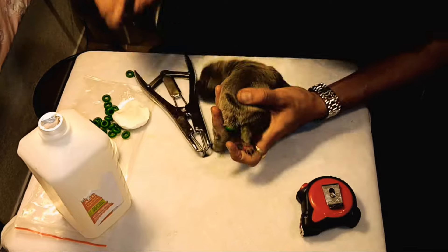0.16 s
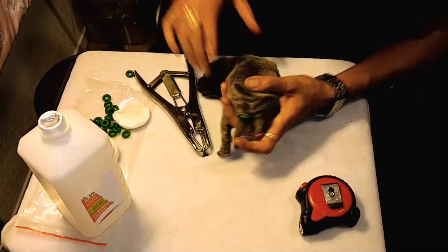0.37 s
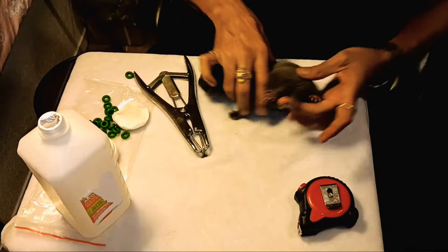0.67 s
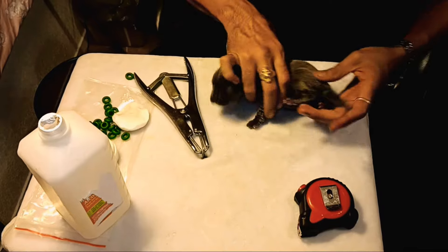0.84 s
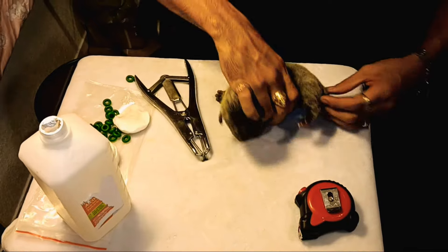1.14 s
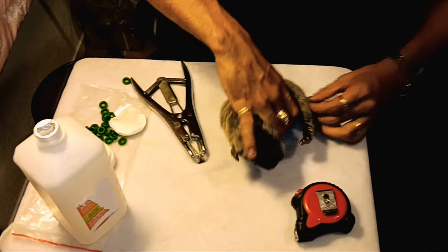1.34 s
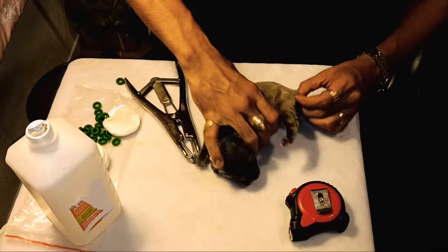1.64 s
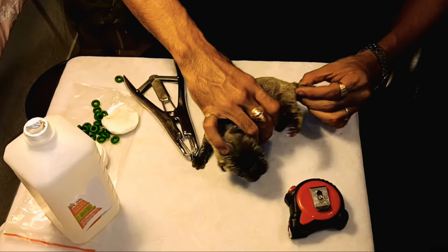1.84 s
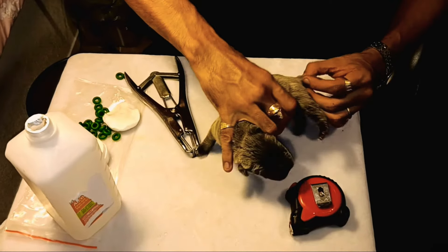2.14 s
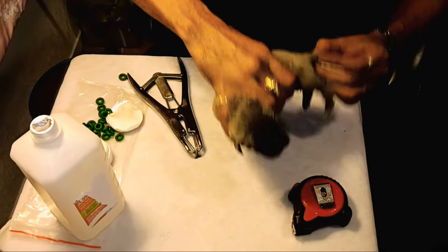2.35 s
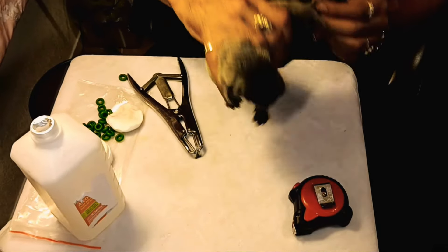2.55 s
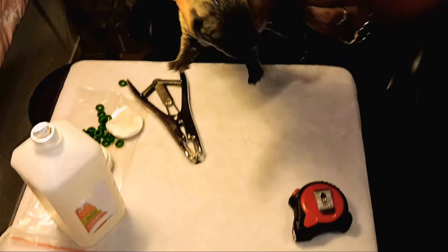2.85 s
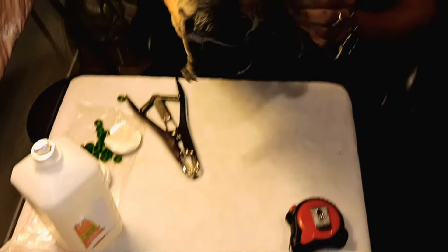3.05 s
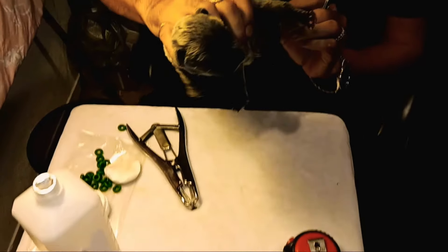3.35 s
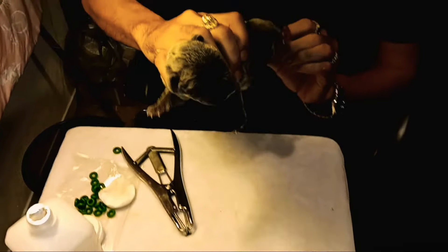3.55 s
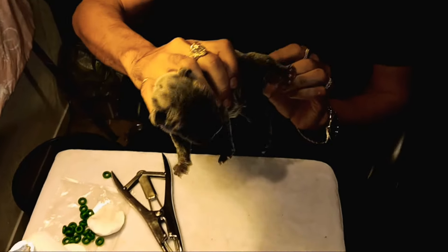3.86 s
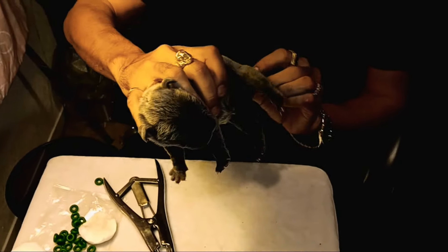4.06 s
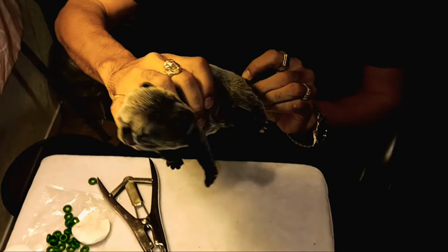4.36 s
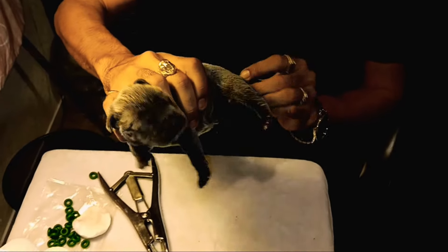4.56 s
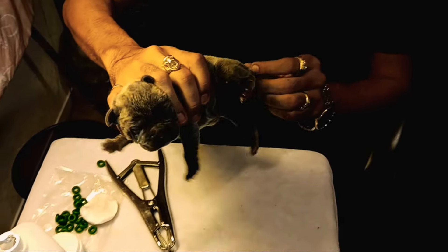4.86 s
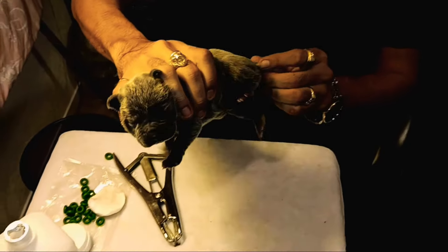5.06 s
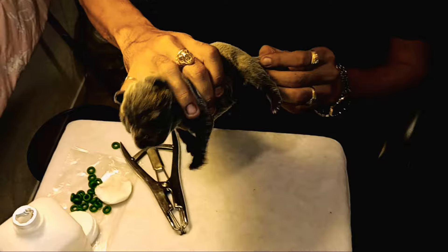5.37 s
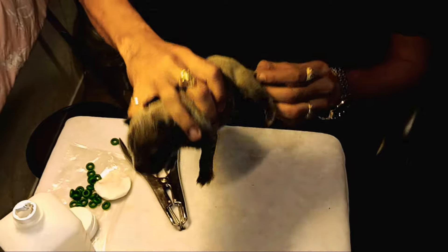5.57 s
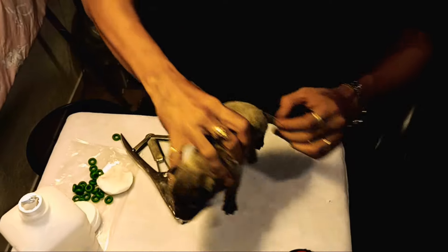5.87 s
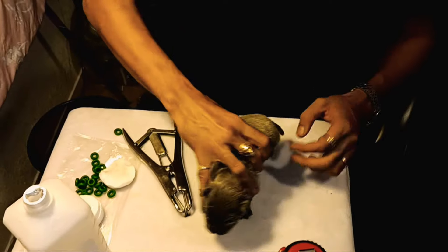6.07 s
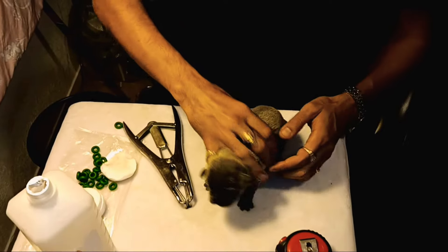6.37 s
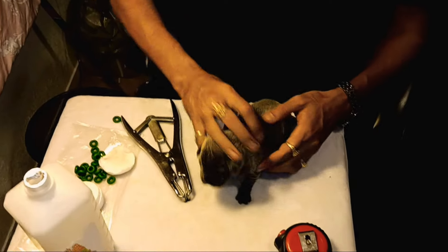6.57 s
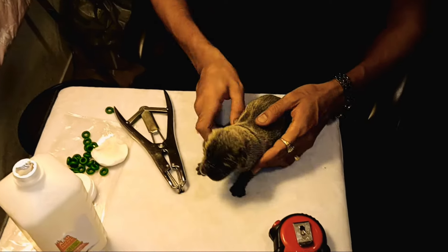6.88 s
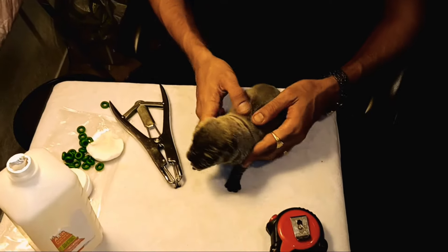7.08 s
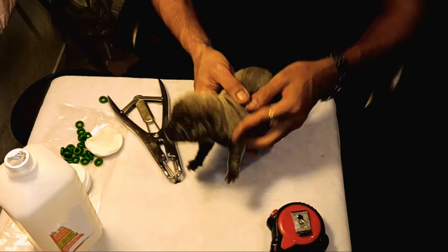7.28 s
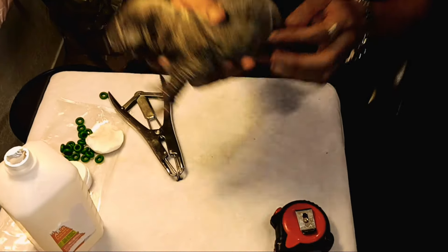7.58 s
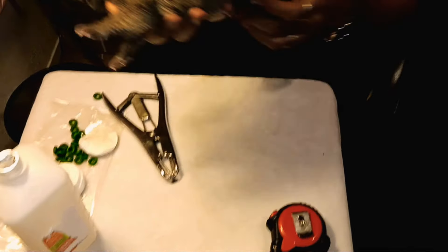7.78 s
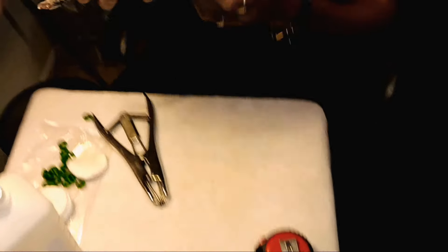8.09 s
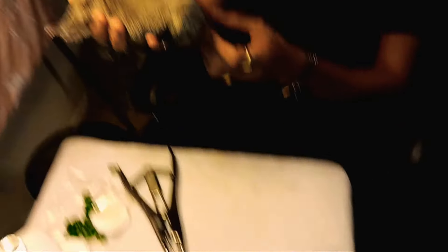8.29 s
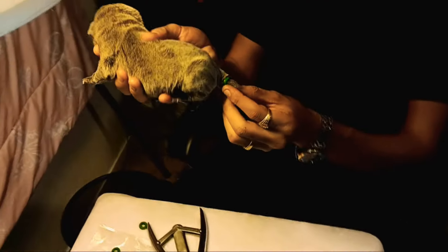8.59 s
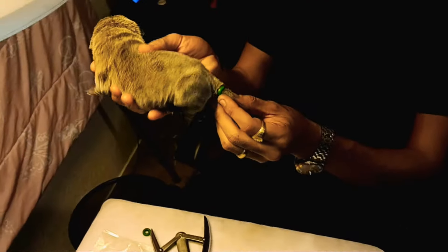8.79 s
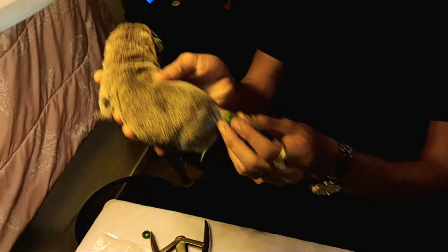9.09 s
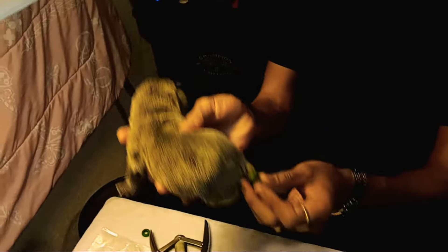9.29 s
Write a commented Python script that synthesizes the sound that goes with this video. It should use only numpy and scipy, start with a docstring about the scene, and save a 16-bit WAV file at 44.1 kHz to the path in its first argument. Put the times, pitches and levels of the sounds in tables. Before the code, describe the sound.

A newborn puppy squeals close by in short, high, wavering cries while litter mates answer in softer, lower yelps inside a hard-walled room.

```python
"""A hard-walled room: a newborn puppy held over a table squeals close to a phone, and litter mates answer.
Each cry is a clean harmonic stack that glides, wavers and breaks off on a lower note, with air in it.
Puffs of shaped noise are the panting in and around the cries; low hums are closed-mouth whimpers.
All of these are stronger at the left microphone but reach it about a millisecond after the right.
The phone turns down faint sound, and a steady hiss lies underneath."""
import sys
import numpy as np
from scipy import signal
from scipy.fft import rfft, irfft, next_fast_len
from scipy.io import wavfile
from scipy.ndimage import uniform_filter1d

SR = 44100
rng = np.random.default_rng(int(sys.argv[2]) if len(sys.argv) > 2 else 0)


def voltage_ratio(decibels):
    """Convert decibels (scalar or array-like) to amplitude ratios, 20 dB per decade."""
    exponent = np.asarray(decibels, float) / 20
    return 10 ** exponent


def master(y):
    """Save y as 16-bit WAV."""
    cut = np.clip(np.atleast_2d(y).T, -1, 1)
    pcm = np.round(cut * 32767)  # scale
    wavfile.write(sys.argv[1], SR, pcm.astype(np.int16))


N = 415863


def along(points, hz):
    """Reads a curve of (Hz, value) points on a log frequency axis, flat beyond its ends."""
    f, v = np.transpose(points)
    return np.interp(np.log(hz + 1), np.log(f + 1), v)


def unit(x):
    """Scales x to an rms of 1."""
    return x / np.sqrt(np.mean(x ** 2) + 1e-20)


def wobble(n, rate):
    """Draws a random curve of straight lines between normal knots, rate knots a second."""
    knots = rng.standard_normal(int(n * rate / SR) + 2)
    return np.interp(np.arange(n) * rate / SR, np.arange(len(knots)), knots)


def coloured(x, points):
    """Filters x by the gain of (Hz, dB) points."""
    m = next_fast_len(x.shape[-1] + 2048)
    gain = voltage_ratio(along(points, np.fft.rfftfreq(m, 1 / SR)))
    return irfft(rfft(x, m) * gain, m)[..., :x.shape[-1]]


# The steady hiss of the microphones. Each row: frequency in Hz, relative density in dB per Hz.
HISS_COLOUR = [(25, -16), (69, -13), (300, -20.5), (2200, -21), (3600, -27), (11500, -43.5), (15500, -63.5)]


def hiss():
    """Shaped noise, faint and steady, partly shared by the two microphones."""
    own = rng.standard_normal((2, N))
    shared = rng.standard_normal(N)
    return np.sqrt(2) * voltage_ratio(-76) * unit(coloured(own + 0.79 * shared, HISS_COLOUR))


# The throat's lift of the lower strong harmonic. Each row: frequency in Hz, gain in dB.
LOW_THROAT_LIFT = [(600, -0.5), (800, -1.2), (930, 3), (1060, 0.3), (1300, 0.5)]


def voice(cries, manners, throat, breath_db, break_share, fall_s, fade_s, jitter, order, rise_s=0.025):
    """Harmonics on a gliding pitch plus air rushing once a cycle; the end breaks to a lower, duller note.

    The two strongest harmonics are numbers order and order + 1.
    """
    out = np.zeros(N + SR)
    k = np.arange(1, 25)[:, None]  # harmonic numbers
    strong = slice(order - 1, order + 1)
    for rows, manner in zip(cries, manners):
        opening_db, closing_db, middle_db, gap_db, treble_db, break_db = manner
        s, hz, level = np.transpose(rows)
        start = max(s[0] - rise_s, 0)
        t = start + np.arange(round((s[-1] + fall_s + fade_s - start) * SR)) / SR
        broken = np.clip((t - s[-1]) / fall_s, 0, 1)

        # pitch: rounded corners, a fall at the end, and a jitter that grows with the break
        glide = uniform_filter1d(uniform_filter1d(np.interp(t, s, hz), size=800), size=800)
        pitch = glide * (1 - (1 - break_share) * broken)
        unsteady = 1 + jitter * (1 + 3 * broken) * wobble(len(t), 149.87)
        turn = 2 * np.pi * np.cumsum(pitch * unsteady) / SR

        # the tabled effort lies midway between the two strong harmonics; effort_db is the upper one
        balance_db = np.interp(t, [s[0], s[-1]], [opening_db, closing_db])
        effort_db = np.interp(t, s, level) - balance_db / 2
        mouth = [(1900, 0), (3200, middle_db), (5200, gap_db), (7000, treble_db)]
        mouth_db = along(mouth, k * pitch) - 2.23 * k * broken  # the mouth closes on the break
        # each harmonic wavers on its own
        shimmer_db = np.array([7.06 * wobble(len(t), 41.06) + 6.17 * wobble(len(t), 8.15) for _ in k])
        # overtones lose 0.11 dB an octave for each dB below the cry's greatest effort
        effort_tilt_db = 0.11 * np.log2(k) * (effort_db - effort_db.max())
        level_db = effort_db + mouth_db + along(throat, k * pitch) + effort_tilt_db
        level_db += shimmer_db * np.minimum(0.11 * k, 0.7)
        # the two strong harmonics are set directly, by their balance
        level_db[strong] = effort_db + balance_db * [[1], [0]] + 0.35 * shimmer_db[strong]
        level_db[order - 1] += along(LOW_THROAT_LIFT, order * pitch)
        tone = np.sqrt(2) * (voltage_ratio(level_db) * np.sin(k * turn)).sum(axis=0)

        # thin air runs through the cry, full air enters with the break
        rush = rng.standard_normal(len(t)) * (1 + 0.5 * np.sin(turn))
        thin = coloured(coloured(rush, [(2000, -14.0), (5200, -3.0), (7500, 8.0)]), throat)
        full = coloured(rush, [(300, -53.0), (700, -5.5)] + throat)
        air = voltage_ratio(treble_db + breath_db) * unit(thin) + voltage_ratio(-5.5) * broken * unit(full)

        fading = np.clip((t - s[-1] - fall_s) / fade_s, 0, 1)
        rise = np.clip((t - s[0]) / rise_s + 1, 0, 1) ** 2
        envelope = rise * voltage_ratio(break_db * broken) * (1 - fading) ** 1.72
        out[round(start * SR):][:len(t)] += envelope * (tone + voltage_ratio(effort_db) * air)
    return out[:N]


# A mate with a higher voice, one list a cry. Each row: time in seconds, pitch in Hz, effort in dB.
HIGH_CRIES = [
    [(0.0, 1232, -27), (0.035, 1192, -29)],
    [(0.37, 798, -52), (0.43, 1126, -37), (0.48, 1095, -31.5), (0.515, 1073, -39.5)],
]
# How each high cry is voiced. Each row: fundamental over second harmonic at the start in dB, the same
# at the end in dB, harmonics near 3.3 kHz in dB, near 5.2 kHz in dB, treble in dB, final break in dB.
HIGH_MANNER = [(-9.5, -8.5, 3.5, 4.7, -4, -9.5), (9.5, 2.5, 2, 1.5, 1, -6)]
# Throat and mouth of this mate and of the held puppy, for all but the two strong harmonics.
# Each row: frequency in Hz, gain in dB over the upper strong harmonic before the cry's own voicing.
CLEAR_THROAT = [(1500, 1.5), (3000, -9), (3800, -20.5), (5340, -33), (6500, -21.5), (7670, -30),
                (8460, -16.5), (10400, -20), (12700, -36), (15500, -105.5)]


def high_mate():
    """Two short cries in a higher voice, the fundamental and second harmonic strongest."""
    return voice(HIGH_CRIES, HIGH_MANNER, CLEAR_THROAT, breath_db=-23, break_share=0.72,
                 fall_s=0.035, fade_s=0.0076, jitter=0.0033, order=1)


# The puppy held close to the phone, one list a cry. Each row: time in seconds, pitch in Hz, effort in dB.
HELD_CRIES = [
    [(0.13, 577, -52.5), (0.174, 709, -42), (0.222, 815, -49), (0.292, 794.8, -41), (0.495, 772, -40.5)],
    [(0.99, 634, -50), (1.07, 838, -47.5), (1.14, 741, -44), (1.206, 769, -46.5), (1.3, 920, -37.5),
     (1.41, 837, -49), (1.572, 788.4, -45), (1.69, 708, -44.5)],
    [(2.06, 603, -49.5), (2.134, 830.5, -49), (2.272, 867, -45), (2.376, 960.4, -46), (2.458, 932.5, -45.5),
     (2.505, 849, -42.5)],
    [(2.82, 645, -53), (2.894, 957, -46), (2.952, 1048, -44.5), (2.998, 1023, -42), (3.085, 820, -43.5)],
    [(3.385, 688, -53.5), (3.455, 989, -41), (3.531, 1081, -34), (3.629, 927, -38), (3.721, 1017, -42),
     (3.765, 938, -35.5)],
    [(4.21, 709, -47.5), (4.262, 930, -40.5), (4.285, 986.4, -31.5), (4.335, 968.4, -34.5),
     (4.36, 946, -36), (4.426, 847.4, -42), (4.632, 953, -39), (4.736, 818, -40), (4.855, 861.5, -40.5)],
    [(5.24, 556, -47.5), (5.294, 778, -43), (5.35, 856.4, -40), (5.518, 807, -41), (5.61, 795, -40)],
    [(6.05, 439.6, -60.5), (6.114, 536.6, -48.5), (6.17, 582.4, -50)],
    [(6.67, 603, -49), (6.76, 953, -37.5), (6.94, 687.5, -41), (7.048, 749.4, -42), (7.095, 722.6, -42.5)],
    [(7.52, 635, -45), (7.574, 970, -42), (7.616, 1037, -36), (7.752, 823.5, -38.5), (7.882, 880, -41),
     (7.96, 796.7, -39)],
    [(8.33, 640, -45.5), (8.398, 995, -42), (8.452, 1047, -40), (8.594, 942.5, -39), (8.7, 853.4, -43.5)],
    [(9.03, 643, -48), (9.08, 802, -41.5), (9.155, 890, -40), (9.31, 733.6, -40)],
]
# How each held cry is voiced. Each row: fundamental over second harmonic at the start in dB, the same
# at the end in dB, harmonics near 3.3 kHz in dB, near 5.2 kHz in dB, treble in dB, final break in dB.
HELD_VOICING = [(2.5, 6, -13.5, -7.5, -8, 2.5), (3, 7, -3, 0.3, 0, 1), (1, 10.5, -3, -6, 0.5, 2.3),
                (19, 11, -2.5, 2.5, 1.5, 2.5), (5, 0, -5.5, 16, -0.5, 4.5), (-4.5, -1, 0.5, -15, -1.5, 9),
                (-11.5, -3.5, 4.5, -6.5, -7.5, 10.5), (-14.5, -11, -17, -12, -10, 10.5),
                (-5, -1, -1, -14.5, -8.5, 8.5), (-2.5, -1.5, 1.8, -0.8, -3, 5.5), (3, 2, 7, -5.5, 1, 9),
                (-1.5, 0.5, -7.5, -22, -3.5, -0.5)]


def held_puppy():
    """Long gliding squeals, the fundamental and second harmonic strongest, breaking off quickly."""
    return voice(HELD_CRIES, HELD_VOICING, CLEAR_THROAT, breath_db=-23.0, break_share=0.8,
                 fall_s=0.01044, fade_s=0.032, jitter=0.0027, order=1)


# Cries of the litter mates. Each row: start in seconds, length in seconds, top pitch in Hz,
# last pitch in Hz, effort from the top on in dB.
MATE_CRIES = [(0.812, 0.12, 732, 768, -41.5), (1.007, 0.23, 588.5, 555, -56), (1.244, 0.28, 623, 533, -51),
              (1.709, 0.08, 581, 599, -45), (1.84, 0.21, 520.3, 532, -53.5),
              (2.13, 0.14, 714.5, 697.5, -40.5), (2.666, 0.1, 587, 593.5, -44.5),
              (3.145, 0.18, 612, 596.5, -44), (3.717, 0.14, 599, 589.6, -43.5),
              (3.919, 0.17, 501, 432, -64), (4.238, 0.17, 663.4, 642.7, -36.5),
              (4.905, 0.23, 521, 467.5, -46), (5.533, 0.18, 562, 574.5, -49.5),
              (6.234, 0.16, 523, 513, -59.5), (7.165, 0.18, 523.4, 524.6, -50),
              (8.1, 0.21, 520, 498.7, -53), (8.74, 0.076, 495.5, 449, -51)]
# How each of them is voiced. Each row: second over third harmonic in dB, harmonics near 3.3 kHz in dB,
# treble in dB.
MATE_VOICING = [(-5, 7.5, -0.3), (2, 10, -5.5), (7.5, 4.5, 3.5), (4.5, 12.5, 8.5), (6.5, 3, 3.5),
                (0, 9, 0.5), (4, 10, 4), (1, 10.5, -0.5), (-0.5, 8, -3), (1.5, -18.5, -6), (-2, 7.5, -2),
                (4, 10.5, -12), (-0.3, 11, -1.5), (-1, 5, -13), (0.5, -18, -11), (-5, -16, -10.5),
                (8.5, -23, 3)]
# Throat and mouth of the mates, for all but the two strong harmonics. Each row: frequency in Hz,
# gain in dB over the upper strong harmonic before the cry's own voicing.
MATE_MOUTH = [(550, -8.5), (1080, 6), (1250, -5.5), (2300, -2), (3000, -15), (3600, -22), (5400, -29),
              (6050, -23), (7380, -25), (9850, -16.5), (13000, -30), (15500, -22.5)]


def litter_mates():
    """Each cry climbs to its top while it swells, then drifts to its last pitch and breaks lower."""
    rest_hz, head_start = 472.5, 0.48  # a cry starts this share of the way from rest to its top
    climb_s, swell_db = 0.09, 6.5
    cries = []
    for s, length, top_hz, last_hz, db in MATE_CRIES:
        first_hz = rest_hz + head_start * (top_hz - rest_hz)
        top_s = s + min(climb_s, 0.75 * length)
        cries.append([(s, first_hz, db - swell_db), (top_s, top_hz, db), (s + length, last_hz, db)])
    # harmonics near 5.2 kHz partly follow those near 3.3 kHz; the final break is 4 dB softer
    manners = [(balance_db, balance_db, middle_db, -2 + 0.43 * middle_db, treble_db, -4)
               for balance_db, middle_db, treble_db in MATE_VOICING]
    return voice(cries, manners, MATE_MOUTH, breath_db=-7.0, break_share=0.76,
                 fall_s=0.038, fade_s=0.0056, jitter=0.0079, order=2)


# Panting in and around the cries. Each row: start in seconds, length in seconds, level at the middle in dB.
PUFFS = [(1.875, 0.81, -61), (3.954, 0.45, -66), (5.112, 0.05, -50), (6.191, 0.16, -58), (6.314, 0.18, -57),
         (6.31, 0.49, -65.5), (7.356, 0.076, -53), (7.976, 0.036, -45), (8.722, 0.21, -53.5),
         (8.919, 0.32, -55), (9.335, 0.071, -55.5)]
# Colour of the panting. Each row: frequency in Hz, relative density in dB per Hz.
PUFF_COLOUR = [(300, -21), (600, -12.5), (1200, -11), (3000, -14), (5400, -12), (7200, -17.5),
               (9200, -10.5), (11500, -19), (13000, -18), (15500, -51)]


def panting():
    """Soft puffs of noise, air through nose and mouth, whose low and high halves flicker separately."""
    t = np.arange(N) / SR
    puffs = sum(voltage_ratio(db) * np.sin(np.pi * np.clip((t - s) / length, 0, 1)) for s, length, db in PUFFS)
    air = np.zeros(N)
    for half in ([(3000, 1.5), (6000, -28)], [(3000, -28.5), (6000, -2)]):
        flicker_db = 4 * wobble(N, 25) + 1.9 * wobble(N, 60)
        air += voltage_ratio(flicker_db) * coloured(rng.standard_normal(N), half)
    return puffs * unit(coloured(air, PUFF_COLOUR))


# Low closed-mouth whimpers. Each row: start in seconds, length in seconds, first pitch in Hz,
# last pitch in Hz, effort at the middle in dB.
HUMS = [(3.405, 0.1, 306, 297, -65.5), (5.125, 0.077, 370, 336, -61.5), (5.335, 0.094, 293.5, 311.4, -65),
        (6.204, 0.15, 321.6, 322.4, -65.5), (6.387, 0.29, 378.5, 330.5, -66),
        (6.86, 0.066, 426, 468, -54.5), (7.303, 0.117, 318, 332, -70), (7.367, 0.06, 448, 424, -64.5),
        (7.473, 0.08, 318.5, 317, -61.5), (8.508, 0.2, 322.3, 308.6, -67.5),
        (8.808, 0.039, 433, 417.6, -67), (9.094, 0.13, 503, 442, -59), (9.354, 0.054, 364, 320, -65)]
# Throat and nose of the whimpers, for all but the two strong harmonics. Each row: frequency in Hz,
# gain in dB over the upper strong harmonic.
HUM_THROAT = [(700, 16.5), (1900, -11), (2600, -28), (15000, -107)]


def whimpers():
    """Low hums through the nose, loudest in the middle, gliding to a last pitch and sagging below it."""
    edge_db = 7  # softer at both ends
    balance_db = 1  # fundamental over second harmonic
    hums = []
    for s, length, first_hz, last_hz, db in HUMS:
        middle = (s + length / 2, (first_hz + last_hz) / 2, db)
        hums.append([(s, first_hz, db - edge_db), middle, (s + length, last_hz, db - edge_db)])
    manners = [(balance_db, balance_db, 0, 0, 0, 0)] * len(hums)
    return voice(hums, manners, HUM_THROAT, breath_db=-36, break_share=0.92,
                 fall_s=0.04, fade_s=0.025, jitter=0.0038, order=1)


# Reverberation of the hard-walled room. Each row: frequency in Hz, nominal 60 dB decay time in seconds.
ROOM_DECAY = [(300, 0.11), (1000, 0.34), (3000, 0.23), (8000, 0.36), (14000, 0.18)]


def placed(x, lag_s, left_db, wet_db):
    """Direct sound reaches the left microphone lag_s later; each microphone has its own decaying noise tail."""
    hz, t, z = signal.stft(rng.standard_normal((2, SR // 2)), SR, nperseg=256)
    decay_db = -60 * (t / along(ROOM_DECAY, hz)[:, None]) ** 0.94
    tail = signal.istft(z * voltage_ratio(decay_db), SR, nperseg=256)[1]
    tail *= voltage_ratio(wet_db) / np.linalg.norm(tail, axis=1, keepdims=True)
    response = np.pad(tail, ((0, 0), (200, 0)))  # the tail waits 200 samples
    response[0, round(lag_s * SR)] = voltage_ratio(left_db / 2)
    response[1, 0] = voltage_ratio(-left_db / 2)
    return signal.fftconvolve(x[None], response, axes=1)[:, :N]


def scene():
    """The voices and the panting in the room, each group with its own lag, left-right level and tail."""
    near = placed(held_puppy() + panting(), 43 / SR, left_db=7.5, wet_db=3.0)
    mates = placed(litter_mates() + high_mate(), 44 / SR, left_db=2.5, wet_db=-3.0)
    hums = placed(whimpers(), 52 / SR, left_db=4.5, wet_db=4.5)
    return near + mates + hums


# Bass cut of the phone's microphones. Each row: frequency in Hz, gain in dB.
BASS_CUT = [(120, -66), (260, 0.5), (400, 2.5)]


def microphones(x):
    """The microphones cut the bass."""
    return coloured(x, BASS_CUT)


def suppressed(x):
    """Noise suppression: parts of the spectrum near or below a threshold are turned down further."""
    threshold_db, firmness = -81.5, 0.53
    z = signal.stft(x, nperseg=1024)[2]
    over_hz = uniform_filter1d(np.abs(z) ** 2, size=3, axis=1)
    power = np.abs(uniform_filter1d(over_hz, size=3, axis=2))
    gain = (power / (power + voltage_ratio(2 * threshold_db))) ** firmness
    return signal.istft(z * gain, nperseg=1024)[1][:, :N]


def roll_off(x):
    """The treble ends steeply here."""
    return signal.sosfilt(signal.butter(12, 15690, fs=SR, output="sos"), x)


def record(dry):
    """The microphones cut the bass, the phone suppresses faint sound, and hiss is added."""
    mix = suppressed(microphones(dry)) + hiss()
    return roll_off(mix)


dry = scene()
out = record(dry)
master(out)
```